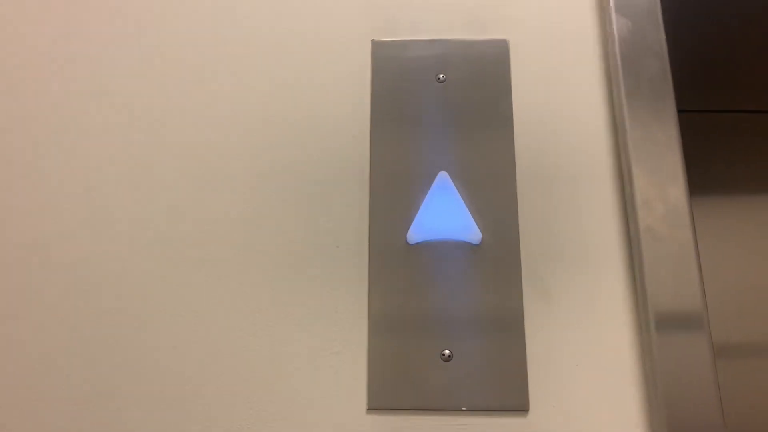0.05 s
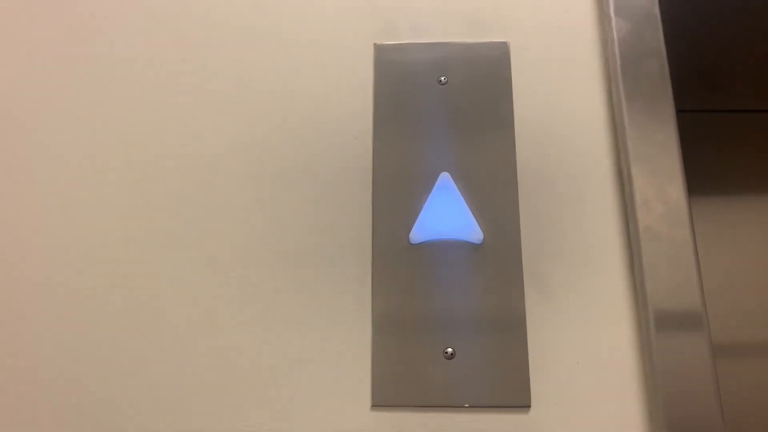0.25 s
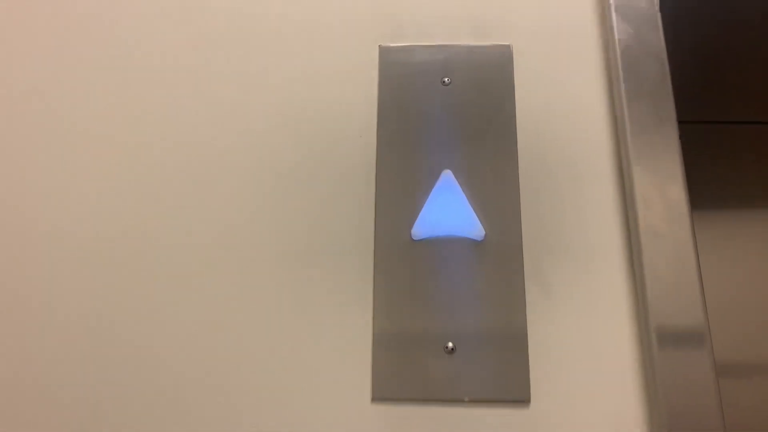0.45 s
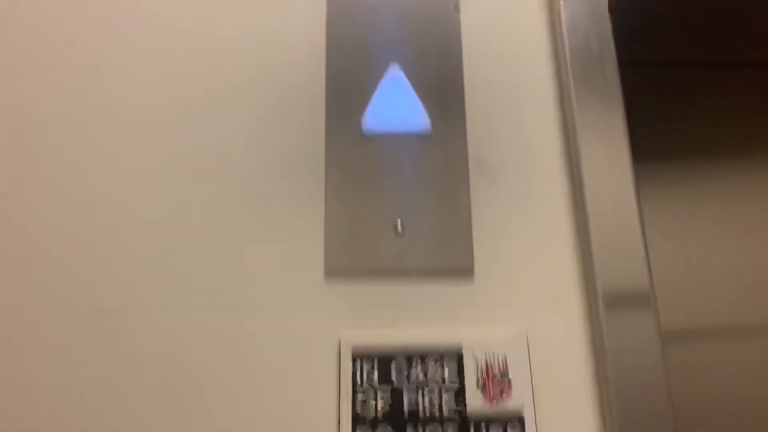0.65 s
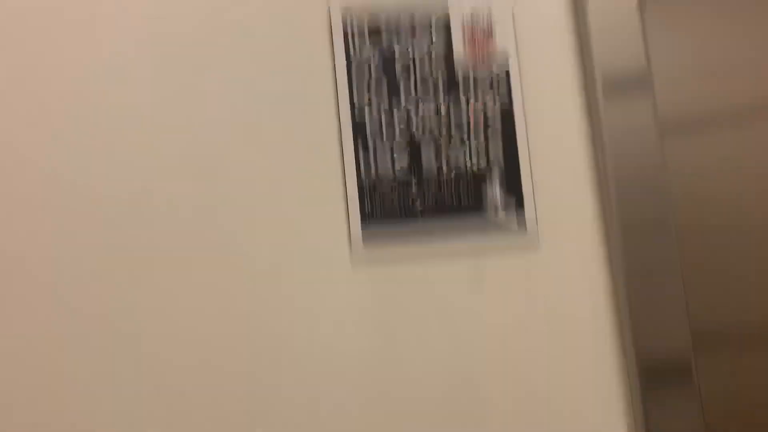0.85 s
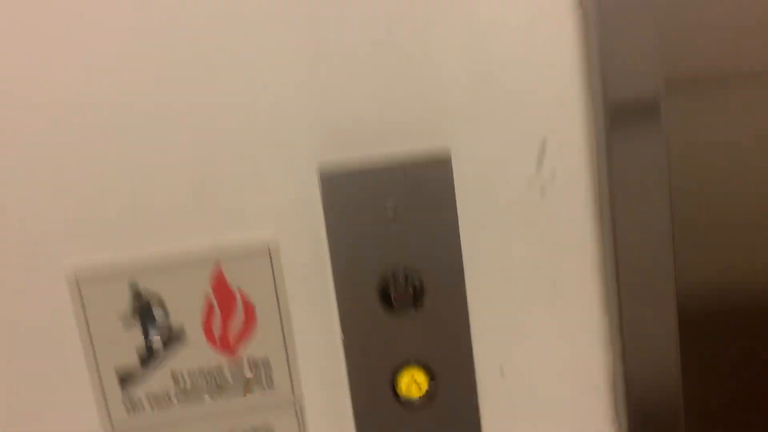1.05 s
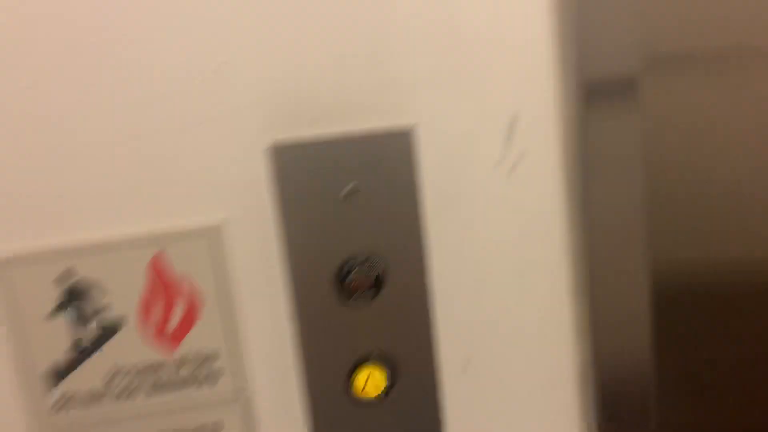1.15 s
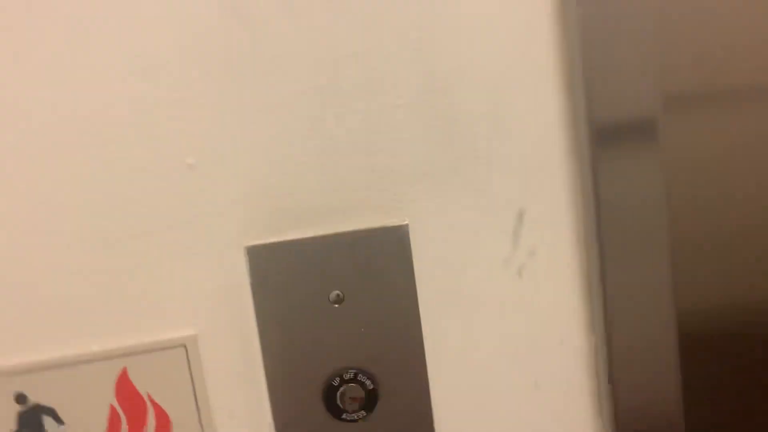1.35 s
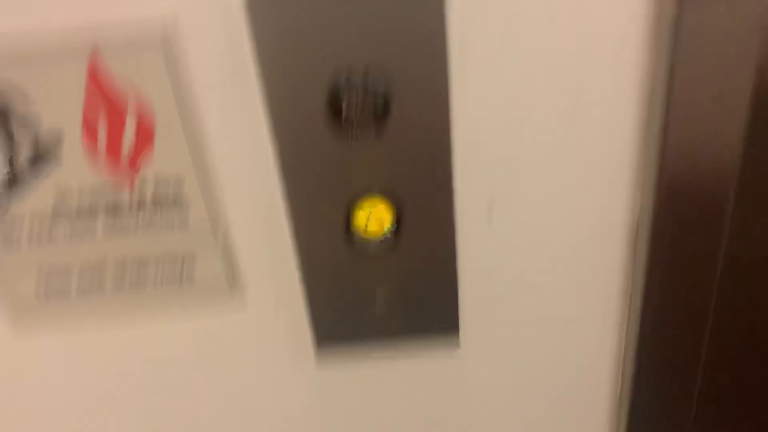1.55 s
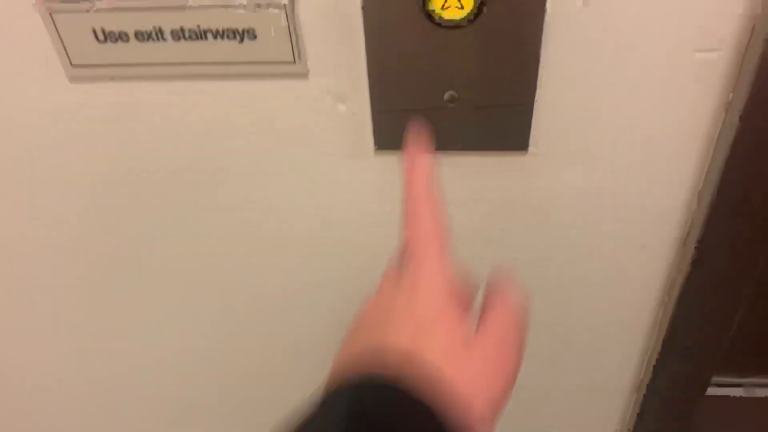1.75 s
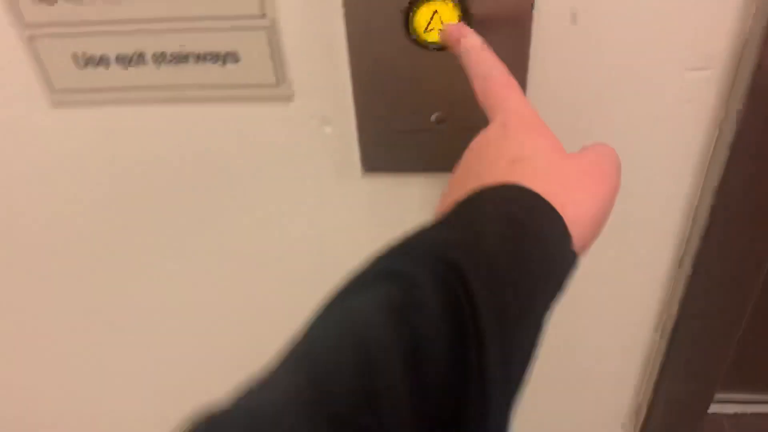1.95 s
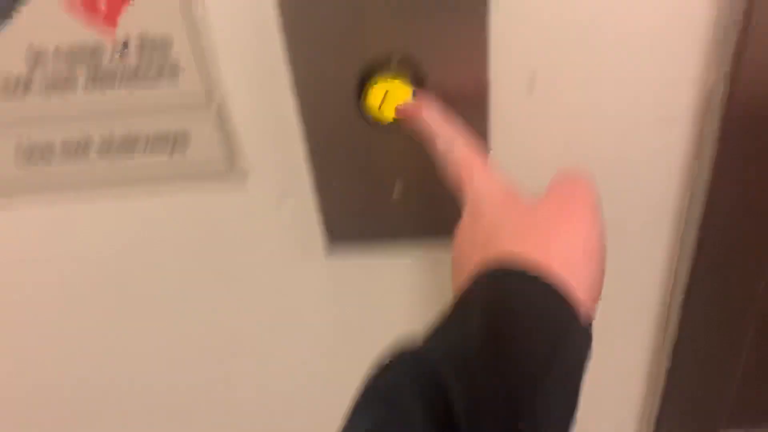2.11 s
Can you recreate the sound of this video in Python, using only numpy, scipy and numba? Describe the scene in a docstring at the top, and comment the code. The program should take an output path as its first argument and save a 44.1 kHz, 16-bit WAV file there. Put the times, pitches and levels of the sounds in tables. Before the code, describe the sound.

An elevator call button clicks sharply after sleeve rustles and a footstep knock, over low rumble

```python
"""Lift lobby.

Ventilation noise with a mains hum: shaped noise plus two wavering sines. A sleeve swishes in two swings:
grainy noise through moving band-passes, with a short scuff between. A shoe lands with a double knock and
small knocks follow: pulses ringing floor modes. The call button clicks: switch modes, then plate rattle.
Hits carry a lobby tail; two microphone ports give left and right.
"""
import sys
import numpy as np
from scipy import signal
from scipy.fft import rfft, irfft
from scipy.io import wavfile
from scipy.ndimage import uniform_filter1d
from numba import njit

SR = 44100
rng = np.random.default_rng(int(sys.argv[2]) if len(sys.argv) > 2 else 0)


def to_wav(sig):
    """Store sig (one row per channel, or 1-D mono) as 16-bit WAV at the path in sys.argv[1].

    Samples outside -1..1 are clipped; the rate is SR.
    """
    pcm = np.clip(np.atleast_2d(sig), -1, 1) * 32767
    pcm = np.round(pcm).astype(np.int16)
    wavfile.write(sys.argv[1], SR, pcm.T)  # frames by channels


N = 96138
T = np.arange(N) / SR
F = np.arange(N // 2 + 1) * SR / N + 1e-3  # offset avoids log(0)


def undb(db):
    """Decibels to amplitude ratio."""
    return 10 ** (np.asarray(db) / 20)


def unit(x):
    """Scale to an RMS of 1."""
    return x / np.sqrt(np.mean(x ** 2))


def unit_energy(x):
    """Scale to a sum of squares of 1."""
    return x / np.sqrt(np.sum(x ** 2))


def along(table, hz):
    """Read a table over log frequency."""
    table = np.array(table, float)
    return np.interp(np.log(hz), np.log(table[:, 0]), table[:, 1])


def band(x, hz, width_hz):
    """Bell-shaped band-pass."""
    bell = np.exp(-((np.fft.rfftfreq(len(x), 1 / SR) - hz) / width_hz) ** 2)
    return irfft(rfft(x) * bell, len(x))


def walk(rate_hz):
    """Random levels held 1 / rate_hz seconds and smoothed twice."""
    hold = int(SR / rate_hz)
    steps = np.repeat(rng.standard_normal(N // hold + 1), hold)
    return uniform_filter1d(uniform_filter1d(steps, hold), hold)[:N]


def fade(t0_s, decay_s):
    """Exponential decay from a sudden start."""
    return np.where(T >= t0_s, np.exp(-np.clip(T - t0_s, 0, 1) / decay_s), 0)


def burst(t0_s, decay_s):
    """Decaying white noise."""
    return fade(t0_s, decay_s) * rng.standard_normal(N)


# Port likeness: (frequency [Hz], likeness [0-1])
PORT_LIKENESS = [(40, 1), (120, 0.86), (250, 0.72), (700, 0.04), (2500, 0.35), (5500, 0.01), (8000, 1),
                 (12000, 1)]
TREBLE_FROM_HZ, BLEND_HZ = 3300, 500  # right port lags below, leads above
TREBLE_LEAD_S, IN_STEP_HZ = 0.000207, 6070
RIGHT_LIFT_HZ, RIGHT_LIFT_WIDTH_HZ = 5000, 1600


def ports(a, b, lag_s, lift_db=0):
    """Mix two signals into left and phase-shifted right, alike by band; lift_db brightens right over left."""
    likeness = np.clip(along(PORT_LIKENESS, F), 0, 1)
    common = rfft(a) * np.sqrt((1 + likeness) / 2)
    differing = rfft(b) * np.sqrt((1 - likeness) / 2)
    high = (1 + np.tanh((F - TREBLE_FROM_HZ) / BLEND_HZ)) / 2
    turns = (high - 1) * F * lag_s + high * (F - IN_STEP_HZ) * TREBLE_LEAD_S
    lift = undb(lift_db / 2 * np.exp(-((F - RIGHT_LIFT_HZ) / RIGHT_LIFT_WIDTH_HZ) ** 2))
    left = irfft((common + differing) / lift, N)
    right = irfft((common - differing) * lift * np.exp(2j * np.pi * turns), N)
    return np.array([left, right])


@njit
def sweep(x, hz, width_hz):
    """State-variable band-pass with a moving centre."""
    y, band_state, low_state = np.empty(len(x)), 0., 0.
    for i in range(len(x)):
        g, damping = np.tan(np.pi * hz[i] / SR), width_hz / hz[i]
        v = (band_state + g * (x[i] - low_state)) / (1 + g * (g + damping))
        band_state = 2 * v - band_state
        low_state = low_state + 2 * g * v
        y[i] = damping * v
    return y


BUILD_CYCLES = 1.32


def ring(x, modes):
    """A struck body: decaying sines that take a few cycles to build, so the lows come late."""
    t = T[:SR // 3]
    body = 0
    for k, (hz, db, t60_s) in enumerate(modes):
        build = 1 - np.exp(-t * hz / BUILD_CYCLES)
        decay = np.exp(-np.log(1000) * t / t60_s)
        body = body + (-1) ** k * undb(db) * build * decay * np.sin(2 * np.pi * hz * t)
    return signal.fftconvolve(x, body)[:N]


# Lobby decay: (frequency [Hz], T60 [s])
LOBBY_DECAY = [(100, 0.87), (500, 0.37), (1200, 0.26), (2500, 0.2), (8000, 0.2), (14000, 0.077)]


def lobby(x):
    """Reverberant tail: octave bands of noise dying at their own rates."""
    t = T[:SR // 2]
    tail = 0
    for hz in 80 * 2. ** np.arange(8):
        decay = np.exp(-np.log(1000) * t / along(LOBBY_DECAY, hz))
        tail = tail + band(rng.standard_normal(SR // 2), hz, hz * 0.45) * decay
    tail = tail * np.clip(t / 0.0015, 0, 1)
    return signal.fftconvolve(x, unit_energy(tail))[:N]


def in_lobby(x, wet_db):
    """A hit with its tail, and a second tail for the ports to differ by."""
    return np.array([x + undb(wet_db) * lobby(x), undb(wet_db) * lobby(x)])


# Air spectrum shape: (frequency [Hz], relative level [dB])
AIR_SPECTRUM = [(13, -48), (22, -12.5), (55, -2.5), (77, -10), (186, -20), (207, -23.5), (245, -24),
                (281, -25.5), (314, -24.5), (415, -33), (450, -32.5), (611, -34.5), (829, -58), (2310, -59),
                (5500, -66), (15300, -65), (16500, -84)]
AIR_DB = -46.5  # RMS before surge and swell [dB]
# Deep rumble surges, used about their mean: (time [s], level [dB])
RUMBLE_SURGES = [(0.038, -46.5), (0.241, -50), (0.561, -45.5), (0.59, -50), (0.73, -46.5), (0.78, -62),
                 (0.871, -40.5), (0.92, -53), (0.96, -40.5), (1.12, -53.5), (1.139, -48.5), (2.05, -49.5),
                 (2.08, -44), (2.161, -44.5)]
# Low-mid swell: (time [s], gain [dB])
AIR_SWELL = [(0, -0.5), (.5, -0.5), (.9, 0), (1.15, 1), (1.45, 2.5), (1.8, 3.5), (2.18, 8)]


def ventilation():
    """Air noise: the deepest part surges, the low mids swell slowly, the hiss stays even."""
    surge_s, surge_db = np.array(RUMBLE_SURGES).T
    swell_s, swell_db = np.array(AIR_SWELL).T
    shaped = irfft(rfft(rng.standard_normal(N)) * undb(along(AIR_SPECTRUM, F)), N)
    air = unit(shaped) * undb(AIR_DB)
    deep, below = (irfft(rfft(air) / (1 + (F / hz) ** 4), N) for hz in (95, 700))
    surge = undb(np.interp(T, surge_s, surge_db - surge_db.mean()))
    swell = undb(np.interp(T, swell_s, swell_db) + walk(6.14))
    hiss = air - below
    return deep * surge + (below - deep) * swell + hiss


# Mains hum partials: (frequency [Hz], amplitude before wavering [dB])
HUM_PARTIALS = [(121, -59.5), (241, -67.5)]


def hum():
    """Mains hum: sines wavering in level and phase."""
    return sum(undb(db + 2 * walk(8)) * np.sin(2 * np.pi * hz * T + walk(8.5)) for hz, db in HUM_PARTIALS)


GRAIN_DB = 2.5  # scales the random walk


def grains():
    """Fibres catching: noise with dense random level changes."""
    return rng.standard_normal(N) * undb(GRAIN_DB * walk(69.7))


def weave_band(hz, width_hz):
    """Grains through two moving band-passes, RMS 1."""
    return unit(sweep(sweep(grains(), hz, width_hz), hz, width_hz))


# One table per swing: (time [s], whistle level [dB], whistle centre [Hz], bright rustle level [dB],
# dull rustle level [dB], narrow core relative to whistle [dB])
SLEEVE_SWINGS = [
    [(0.2, -94, 1810, -100, -82, -12), (0.334, -91, 1400, -84, -70, -17), (0.43, -90, 1710, -95, -80, 11.5),
     (0.448, -84, 1740, -84, -72.5, -13), (0.494, -73, 1410, -100, -72, -3),
     (0.596, -80, 1520, -87.5, -72, -2), (0.66, -82.5, 1360, -83, -73, -6),
     (0.79, -68, 1500, -73.5, -65.5, -1), (0.846, -64, 1620, -70.5, -64.5, -3),
     (0.9, -63.5, 1657, -69.5, -60.5, 5), (0.955, -67, 1650, -69, -62.5, -1.5),
     (0.982, -67.5, 1920, -71, -61.5, -3.5), (1.018, -79, 1700, -75, -67, -1),
     (1.1, -100, 1480, -106, -86, -9)],
    [(1.2, -72, 1820, -70, -70, -9), (1.238, -73, 2020, -80, -69, 0), (1.256, -70, 2000, -78, -68.5, -3),
     (1.288, -68.5, 1920, -80.5, -67.5, 0), (1.332, -68, 1730, -72, -67.5, 3),
     (1.352, -66.5, 1960, -69, -67, -3), (1.366, -63.5, 2100, -71, -62, 6.5),
     (1.41, -62.5, 1940, -74.5, -62, 3), (1.44, -60.5, 1930, -69, -65, -0.5),
     (1.466, -65, 2080, -66, -62.5, -6), (1.514, -62, 2040, -61, -62, -15.5),
     (1.546, -66, 2050, -66, -63.5, 1), (1.644, -69.5, 1960, -72.5, -65, -7),
     (1.83, -70, 1820, -70, -66, 1)],
]
# Bright rustle shape: (frequency [Hz], relative level [dB])
RUSTLE_SPECTRUM = [(2500, -5), (4000, -2.5), (7000, -10), (11000, -12), (15300, -20), (16500, -36)]
WEAVE_WIDTH_HZ, CORE_WIDTH_HZ = 990., 150.
UPPER_RATIO, UPPER_DB = 1.22, -4.5
CUFF_HZ, CUFF_WIDTH_HZ, CUFF_DB = 2473, 106, -9.5
SETTLE_DB_PER_S = 71  # after the last table row


def sleeve():
    """Fibres catch in dense grains; the weave whistles at a moving pitch over bright and dull rustle."""
    time_s, whistle_db, hz, bright_db, dull_db, core_db = np.concatenate(SLEEVE_SWINGS).T
    centre_hz = np.interp(T, time_s, hz)
    settle_db = SETTLE_DB_PER_S * np.clip(T - time_s[-1], 0, 1)

    def gain(level_db):
        return undb(np.interp(T, time_s, level_db) - settle_db)

    whistle = weave_band(centre_hz, WEAVE_WIDTH_HZ)
    whistle = whistle + undb(np.interp(T, time_s, core_db)) * weave_band(centre_hz, CORE_WIDTH_HZ)
    whistle = whistle + undb(UPPER_DB) * weave_band(centre_hz * UPPER_RATIO, WEAVE_WIDTH_HZ)
    whistle = whistle + undb(CUFF_DB) * unit(band(grains(), CUFF_HZ, CUFF_WIDTH_HZ))
    rustle = rfft(grains()) * undb(along(RUSTLE_SPECTRUM, F))
    bright = unit(irfft(rustle / (1 + (2300 / F) ** 4), N))
    dull = unit(band(grains(), 707, 830))
    return whistle * gain(whistle_db) + bright * gain(bright_db) + dull * gain(dull_db)


# Scuff: (time [s], level [dB], decay [s])
SCUFF_EVENT = (1.157, -61.5, 0.048)
# Scuff bands: (frequency [Hz], width [Hz], relative level [dB])
SCUFF_SPECTRUM = [(670, 370, -0.5), (3070, 190, 1.5), (5160, 1900, -6.5), (6800, 8900, -4.5)]


def scuff():
    """A short scuff: bands of grains with a quick rise and exponential decay."""
    t0_s, level_db, decay_s = SCUFF_EVENT
    envelope = fade(t0_s, decay_s) * np.clip((T - t0_s) / 0.015, 0, 1)
    return envelope * sum(undb(level_db + db) * unit(band(grains(), hz, width_hz))
                          for hz, width_hz, db in SCUFF_SPECTRUM)


# Knocks: (time [s], level [dB], brightness [dB], weight [dB], scrape [dB], contact [s])
KNOCK_EVENTS = [(1.860, -43.5, 14, -23, 5, 0.0026), (1.8655, -28, -2.5, -0.5, -10, 0.0041),
                (1.874, -36.5, -12, 2, -31, 0.0033), (1.9014, -42.5, 8.5, -10, 0.5, 0.0022),
                (1.9065, -40, -6.5, 0.5, -21.5, 0.0025), (1.917, -35, -30, -11, -24, 0.0024),
                (1.929, -49.5, -15, -2, -30, 0.0022), (2.002, -45.5, -27, 6.5, -21, 0.0015),
                (2.146, -47, -27, -11, -25, 0.0011), (2.164, -52, -7.5, -25, -49, 0.0012)]
# Floor modes: (frequency [Hz], level [dB], T60 [s])
FLOOR_RESONANCES = [(126, 3, 0.067), (202, -1, 0.076), (244.6, -0.5, 0.083), (296.6, 9, 0.057),
                    (336, -1, .06), (403.2, 4.5, 0.07), (489, 13.5, 0.044), (529, 10.5, 0.054),
                    (652, 11.5, 0.027), (783, -5.5, 0.056), (1000, 3, 0.03), (1082, -1.5, 0.033),
                    (1290, -2, 0.014), (1628, -1, 0.025), (1930, 0, 0.013), (2215, -4.5, 0.027),
                    (2560, -5, 0.018)]
SCRAPE_DECAY_S, KNOCK_WET_DB = 0.0047, -7


def knocks():
    """Each knock pushes the floor's low modes; its rough edge rings the high ones, with a scrape on top."""
    deep, low, high = FLOOR_RESONANCES[:5], FLOOR_RESONANCES[5:9], FLOOR_RESONANCES[9:]
    out = 0
    for t0_s, db, bright_db, weight_db, scrape_db, contact_s in KNOCK_EVENTS:
        push_s = contact_s / 4
        push = fade(t0_s, push_s) / (push_s * SR)
        edge = unit_energy(burst(t0_s, contact_s))
        scrape = band(burst(t0_s, SCRAPE_DECAY_S), 2800, 11800)
        hit = undb(weight_db) * ring(push, deep) + ring(push, low)
        hit = hit + undb(bright_db) * ring(edge, high) + undb(scrape_db) * scrape
        out = out + in_lobby(undb(db) * hit, KNOCK_WET_DB)
    return out


# Switch modes: (frequency [Hz], level [dB], T60 [s])
SWITCH_RESONANCES = [(5740, -11.5, 0.0024), (8440, -10.5, .003), (10940, -19, 0.0046),
                     (13600, -0.5, 0.0024), (16000, -12, 0.0023)]
# Plate rattle: (frequency [Hz], width [Hz], relative level [dB], decay [s])
PLATE_BANDS = [(880, 400, -33, 0.012), (1650, 250, -22, 0.01), (2720, 1200, -33, 0.016),
               (4090, 710, -35, 0.0092), (5930, 1900, -45.5, 0.025), (12000, 2900, -36, 0.0033)]
CLICK_S, SNAP_DB, CLICK_WET_DB = 2.0544, -18, -12.5
RATTLE_DB, RATTLE_RISE_S = -13.5, 0.0011


def button():
    """The switch snaps over, very bright, and the plate's rattle builds behind it."""
    impulse = 1. * (np.arange(N) == int(CLICK_S * SR))
    snap = ring(impulse, SWITCH_RESONANCES)
    rattle = 0
    for hz, width_hz, db, decay_s in PLATE_BANDS:
        noise = unit(band(rng.standard_normal(N), hz, width_hz))
        rattle = rattle + undb(db) * noise * fade(CLICK_S, decay_s)
    rattle = rattle * (1 - fade(CLICK_S, RATTLE_RISE_S))
    return in_lobby(undb(SNAP_DB) * snap + undb(RATTLE_DB) * rattle, CLICK_WET_DB)


STEADY_LAG_S, KNOCK_LAG_S, CLICK_LAG_S = 0.00011, 0.00032, 0.00025  # right port, bass and mids
RIGHT_LIFT_DB = 9.5  # hits are brighter on the right


def scene():
    """Sum the air, cloth and hits at the two ports."""
    steady = ports(ventilation() + hum() + sleeve() + scuff(),
                   ventilation() + sleeve() + scuff(), STEADY_LAG_S)
    steps = ports(*knocks(), KNOCK_LAG_S, RIGHT_LIFT_DB)
    click = ports(*button(), CLICK_LAG_S, RIGHT_LIFT_DB)
    return steady + steps + click


# Gentle treble dip: (frequency [Hz], width [Hz], gain [dB])
TREBLE_DIPS = [(8980, 3600, -1)]
TOP_HZ = 16500


def record(dry):
    """A shallow dip softens the treble; the top is cut."""
    dips = undb(sum(db * np.exp(-((F - hz) / width_hz) ** 2) for hz, width_hz, db in TREBLE_DIPS))
    top_cut = signal.ellip(8, .2, 70, TOP_HZ, fs=SR, output="sos")
    return signal.sosfilt(top_cut, irfft(rfft(dry) * dips, N))


dry = scene()
out = record(dry)
to_wav(out)
```